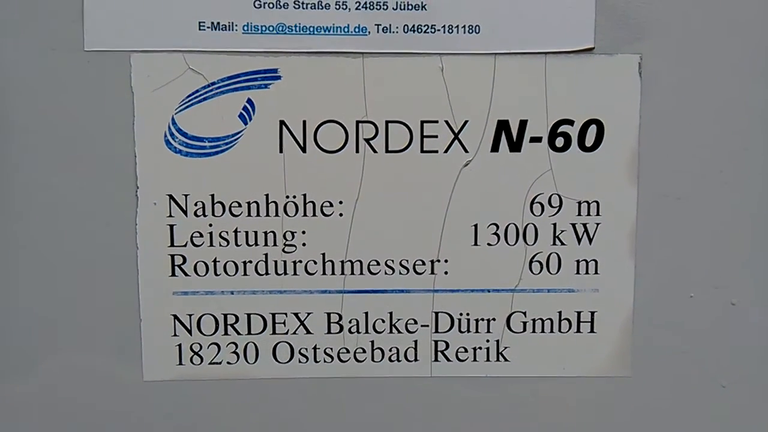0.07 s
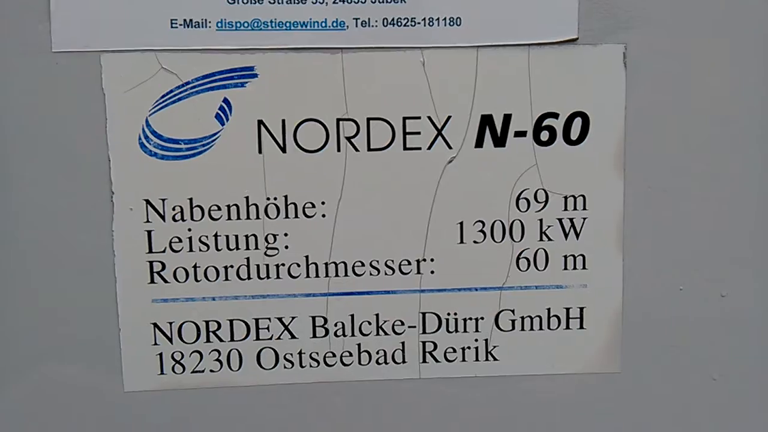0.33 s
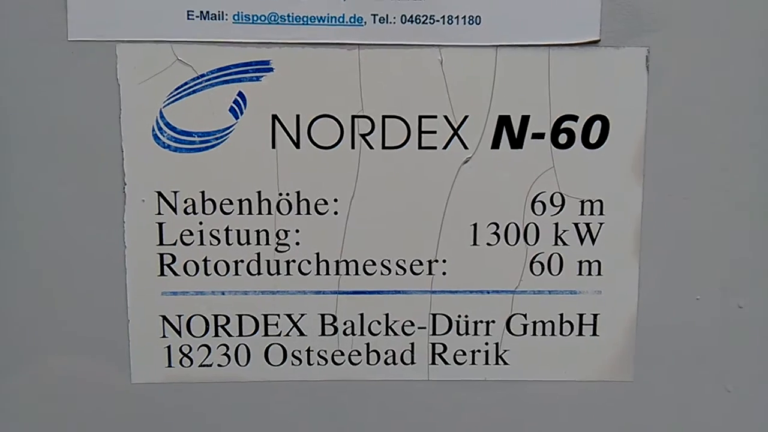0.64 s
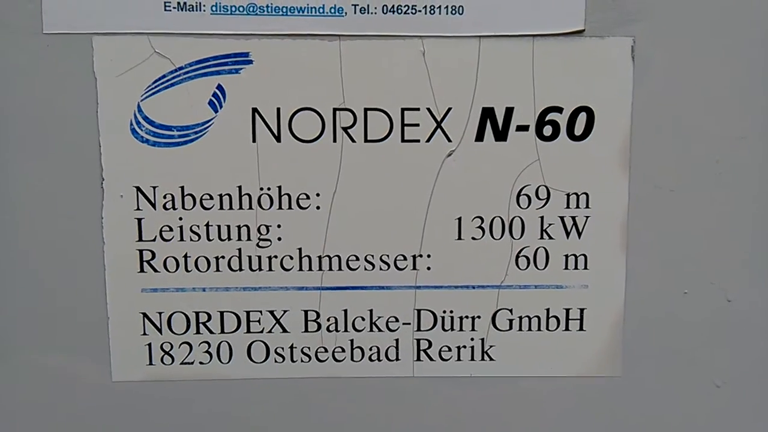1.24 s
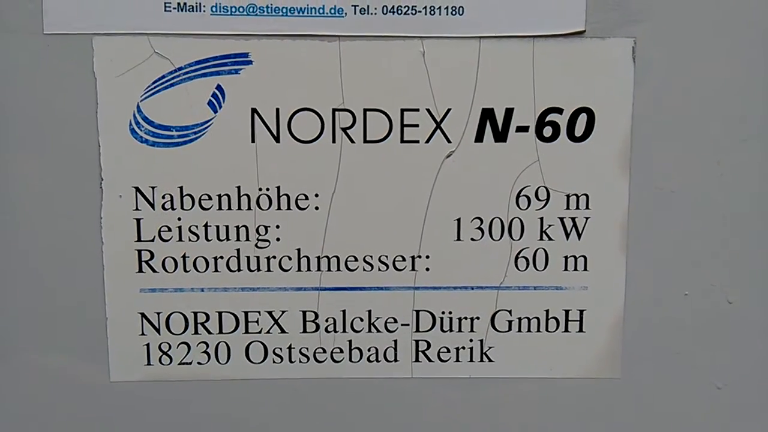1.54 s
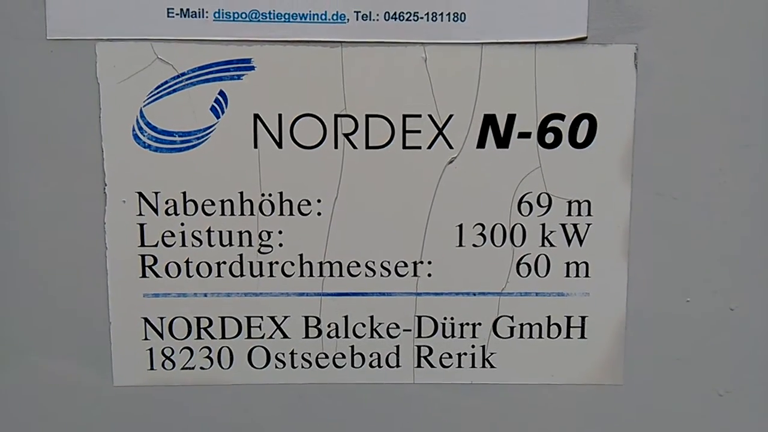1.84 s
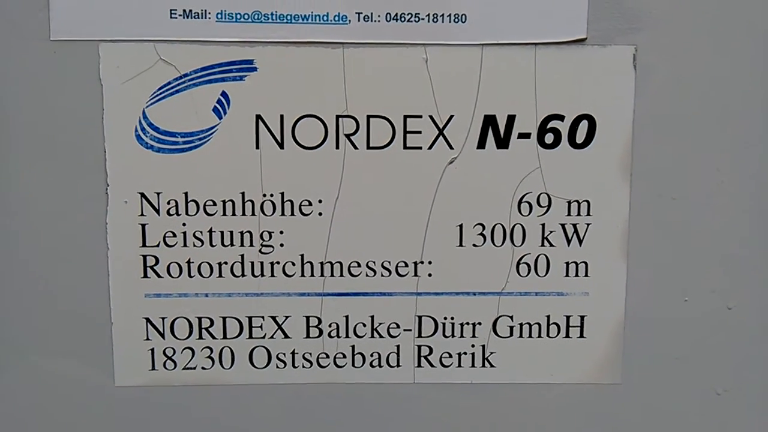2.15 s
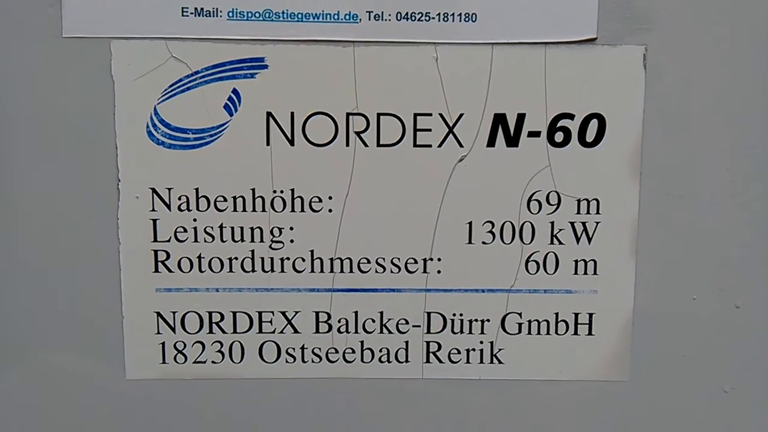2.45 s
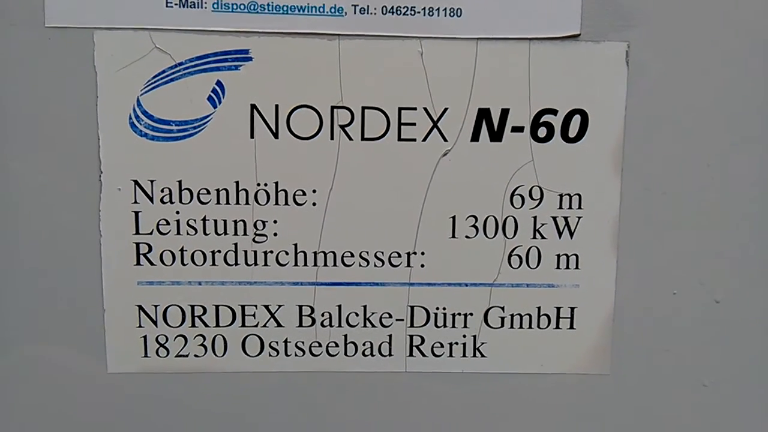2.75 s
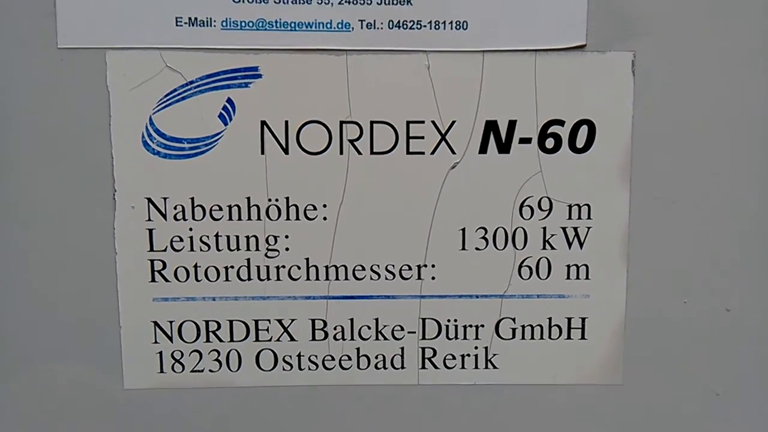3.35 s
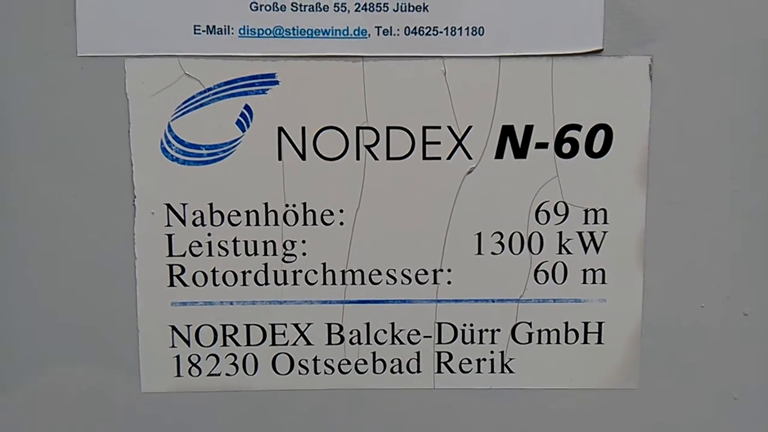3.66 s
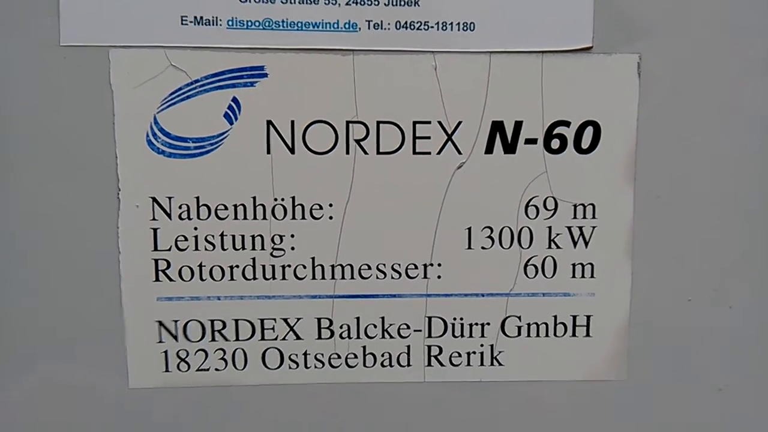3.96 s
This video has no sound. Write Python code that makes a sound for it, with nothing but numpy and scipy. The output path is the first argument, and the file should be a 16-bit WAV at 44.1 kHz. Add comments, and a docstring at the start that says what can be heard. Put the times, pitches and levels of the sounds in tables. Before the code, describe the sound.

Gusty wind buffets the microphone with a low, fluttering rumble and sharp bumps.

```python
"""At the foot of a wind turbine, gusty wind buffets a hand-held microphone.
Big eddies push out a low rumble; small ones make a fluttering rush that turns to fizz in the hard
gusts, with sharp bumps of air on top. Behind the wind sit a thin hiss of air, a faint high swish and
a sinking whistle, the last two probably from the blades. The loudest peaks overload and are rounded off."""
import sys
import numpy as np
from scipy import signal
from scipy.fft import rfft, irfft
from scipy.io import wavfile
from scipy.ndimage import uniform_filter1d, minimum_filter1d

SR = 44100
rng = np.random.default_rng(int(sys.argv[2]) if len(sys.argv) > 2 else 0)


def materialize(psi):
    """Save the field psi as 16-bit PCM at rate SR to the path in sys.argv[1].

    A 1-D psi becomes a single channel; in a 2-D psi each row is a channel.
    """
    bounded = np.clip(np.atleast_2d(psi).T, -1, 1)
    quanta = np.round(bounded * 32767).astype(np.int16)
    wavfile.write(sys.argv[1], SR, quanta)


N = 176400

# pressure swings on the diaphragm (time [s], deep rumble level [dB], thud level [dB])
PRESSURE_SWINGS = [(0.0, -35, -22.5), (0.09, -19, -23), (0.11, -25, -24.5), (0.23, -21, -31),
                   (0.3, -26, -22), (0.31, -37, -28), (0.33, -18, -25.5), (0.44, -17.5, -33),
                   (0.47, -19, -23.5), (0.54, -22, -28.5), (0.59, -46, -21.5), (0.62, -22, -32),
                   (0.68, -38, -29), (0.72, -20, -25.5), (1.04, -32.5, -31), (1.12, -23, -32),
                   (1.18, -28, -34), (1.29, -27.5, -23.5), (1.36, -28.5, -39), (1.44, -42, -34),
                   (1.46, -25.5, -22.5), (1.58, -33, -50.5), (1.67, -21, -28), (1.8, -27, -25),
                   (1.83, -28, -26), (1.88, -26.5, -21.5), (2.34, -21, -25.5), (2.49, -23, -17),
                   (2.54, -19, -34), (2.58, -22, -21.5), (2.61, -18.5, -23.5), (2.93, -23.5, -24.5),
                   (3.19, -16.5, -23), (3.24, -11, -18), (3.29, -28, -25), (3.3, -14, -13.5),
                   (3.42, -24, -20.5), (3.51, -11, -22.5), (3.55, -35, -21), (3.61, -14, -22),
                   (3.7, -19, -23), (4.0, -20.5, -22)]
# turbulence at the microphone port (time [s], buffet level [dB], rush level [dB], fizz level [dB])
GUST_LEVELS = [(0.0, -39, -38, -59), (0.02, -31.5, -45.5, -67), (0.1, -32, -40, -68),
               (0.12, -25, -35, -59.5), (0.24, -31, -40, -62), (0.29, -33.5, -64, -73),
               (0.31, -21, -22, -48), (0.33, -23, -20.5, -31), (0.34, -32.5, -35, -53),
               (0.48, -33, -40.5, -62), (0.51, -26.5, -26.5, -42), (0.71, -24, -26, -49.5),
               (0.78, -31, -36.5, -64), (0.9, -23, -23.5, -44.5), (0.96, -28.5, -36, -67),
               (1.18, -26, -26.5, -58), (1.4, -24.5, -35, -74), (1.44, -24.5, -27.5, -62),
               (1.53, -31, -39, -83), (1.69, -27, -38.5, -66), (1.84, -35, -68, -75),
               (1.85, -22.5, -48, -71), (1.88, -33, -38.5, -75), (2.04, -22.5, -28, -56),
               (2.06, -30, -33.5, -57.5), (2.22, -36, -53.5, -66), (2.26, -27, -36, -64),
               (2.41, -40, -46.5, -79), (2.48, -30, -55, -61), (2.49, -27, -32, -47),
               (2.57, -29, -30, -52.5), (2.58, -36, -22.5, -45), (2.62, -32.5, -35, -58),
               (2.73, -28.5, -31.5, -51), (2.74, -47, -39, -66), (2.77, -31.5, -47.5, -61),
               (3.0, -29, -46, -68.5), (3.01, -24.5, -36, -61), (3.14, -29.5, -29, -51.5),
               (3.17, -19, -36, -37.5), (3.2, -34.5, -34, -54), (3.36, -24.5, -27, -40),
               (3.58, -29, -37.5, -55.5), (3.64, -29, -31, -45), (3.68, -38, -36.5, -59),
               (3.8, -22.5, -28, -36), (3.94, -29, -31, -50), (4.0, -21, -25, -35)]
# choppiness of the flow (time [s], flutter depth [factor])
CHOPPINESS = [(0, 1.23), (.45, 0.81), (.6, 0.51), (1.45, 0.83), (1.9, 1.1), (2.6, 0.95), (3.0, 1.06),
              (3.35, 1.06), (3.7, 1.25), (3.82, 0.39), (4, 1)]
# split-second dips, and the odd lift, in the turbulence (time [s], half width [s], gain [dB])
GUST_DIPS = [(.285, 0.0055, -5), (.372, 0.0043, -7), (1.084, .012, 0.5), (1.141, 0.0022, -2.5),
             (1.864, 0.0044, -7), (1.975, 0.0034, -3), (2.225, 0.009, 2), (2.475, 0.0088, -6),
             (2.834, 0.0066, -8), (2.985, 0.0098, -6), (3.163, 0.0033, -8.5), (3.331, 0.003, -15.5),
             (3.409, .005, -1.5), (3.525, 0.0052, -9), (3.588, 0.0071, -4), (3.678, 0.0047, -5)]
# swells of high hiss (time [s], level [dB], half width [s])
SWISH_CUES = [(.4, -63, 0.091), (1.5, -58.5, 0.11), (2.15, -66, 0.024), (2.46, -63, 0.11), (2.82, -64, .06),
              (3.58, -66, 0.15)]
# the whistle's downward glide (time [s], pitch [Hz], level [dB])
WHISTLE_GLIDE = [(.26, 10500, -80), (.35, 9750, -71), (.43, 9320, -77), (.5, 9050, -77), (.7, 8700, -85),
                 (.93, 8350, -73), (1.1, 8300, -92)]
# hits of air (time [s], length [s], slap level [dB], crackle level [dB])
BUMP_CUES = [(.293, 0.0033, -35, -70), (0.301, .033, -21, -37.5), (0.38, 0.014, -28, -42.5),
             (0.512, 0.014, -18, -39), (0.607, 0.0062, -17.5, -38), (1.145, 0.0069, -26, -44),
             (1.307, 0.011, -25, -66), (1.652, 0.0055, -25, -65), (1.764, 0.024, -39, -74),
             (1.98, 0.0065, -21, -50), (2.039, 0.0042, -23.5, -51), (2.079, 0.006, -18.5, -39.5),
             (2.24, 0.014, -28.5, -56), (2.464, 0.0035, -29, -66), (2.489, 0.0052, -27, -58),
             (2.582, 0.003, -9.5, -25), (2.635, 0.013, -26, -48), (2.753, 0.0074, -28.5, -68),
             (2.848, 0.0074, -38, -73), (3.003, 0.0038, -26.5, -65), (3.034, .005, -32, -48),
             (3.167, 0.0071, -18, -53), (3.241, 0.0068, -22.5, -39), (3.312, 0.0097, -19, -33.5),
             (3.349, 0.0027, -40, -33), (3.364, 0.004, -21, -26), (3.382, 0.0034, -36, -34),
             (3.423, 0.0094, -20.5, -32.5), (3.475, 0.0068, -22, -37.5), (3.537, 0.0022, -20.5, -60),
             (3.597, .006, -24.5, -40), (3.643, 0.005, -19.5, -33), (3.686, 0.0034, -24, -56),
             (3.713, 0.0035, -19, -34.5), (3.789, 0.0086, -21, -32.5)]

# tone of each noise layer (frequency [Hz], relative level [dB])
RUMBLE_EQ = [(15, -45.5), (30, -27), (42, -6.5), (60, -2), (95, -6), (130, -12.5), (200, -31.5), (400, -60),
             (3000, -110)]
THUD_EQ = [(50, -29.5), (90, -5), (125, -0.5), (180, -2), (250, -8), (350, -14), (900, -55), (3000, -89.5)]
BUFFET_EQ = [(100, -16), (250, -6), (480, -0.5), (800, -6.5), (1100, -10.5), (1700, -24), (3000, -51.5),
             (6000, -78.5)]
RUSH_EQ = [(400, -25), (750, -1.5), (1050, -2.5), (1700, -3), (2400, -12), (3200, -21.5), (4500, -38.5),
           (8000, -75.5)]
FIZZ_EQ = [(1200, -26.5), (2400, 4.5), (3500, 1.5), (5000, -7.5), (7000, -16.5), (9000, -24.5),
           (11000, -36), (14000, -43.5)]
AIR_EQ = [(500, -1), (3000, 6.5), (5200, -2), (7500, 4), (9000, -4), (11000, -11), (14000, -12)]
SWISH_EQ = [(3000, -13), (5500, -6.5), (7700, 2), (9500, -4), (11500, -16), (14000, -21)]
SLAP_EQ = [(40, -18), (200, 3), (500, 2), (1000, -2.5), (1800, -7.5), (2600, -15), (4000, -32.5),
           (7500, -56.5), (14000, -78)]
CRACKLE_EQ = [(600, -18.5), (1800, -0.5), (3500, 4.5), (6000, -4.5), (8000, -11), (10500, -27.5),
              (14000, -35.5)]

TIME, FREQS = np.arange(N) / SR, np.fft.rfftfreq(N, 1 / SR)


def amp(db):
    """Decibels to gain."""
    return 10 ** (np.asarray(db) / 20)


def unit(x):
    """Scales to rms 1."""
    return x / np.sqrt(np.mean(x ** 2) + 1e-20)


def curves(table):
    """One automation curve for each column after the time, in straight ramps."""
    times, *columns = np.transpose(table)
    return [np.interp(TIME, times, column) for column in columns]


def bell(when, half_width):
    """A bell-shaped fade in and out."""
    return np.exp(-.5 * ((TIME - when) / half_width) ** 2)


def noise(eq):
    """Noise of rms 1 through an EQ curve."""
    hz, db = np.transpose(eq)
    gain = amp(np.interp(np.log(FREQS + 1), np.log(hz), db))
    return unit(irfft(rfft(rng.standard_normal(N)) * gain, N))


def steady(x, span_s):
    """Levels out the slow swells of a noise, keeping its fast lumps."""
    size = int(span_s * SR)
    power = abs(uniform_filter1d(uniform_filter1d(x ** 2, size), size)) + 1e-14
    return x / np.sqrt(power)


def patchy(x, patch_hz, patch_s, depth_db=3.0):
    """Lets narrow stretches of the spectrum swell and fade by chance."""
    hz, t, spectrum = signal.stft(x, SR, nperseg=1024, noverlap=768)
    across, along = np.fft.fftfreq(len(hz), hz[1])[:, None], np.fft.fftfreq(len(t), t[1])
    blur = np.exp(-(across * patch_hz) ** 2 - (along * patch_s) ** 2)
    patches = unit(np.fft.ifft2(np.fft.fft2(rng.standard_normal(spectrum.shape)) * blur).real)
    _, mottled = signal.istft(spectrum * amp(depth_db * patches), SR, nperseg=1024, noverlap=768)
    return unit(mottled[:N])


def rumble(deep_trim_db, thud_trim_db):
    """Large eddies push on the diaphragm: a deep rumble with thudding above it."""
    deep_db, thud_db = curves(PRESSURE_SWINGS)
    deep = steady(noise(RUMBLE_EQ), span_s=.034) * amp(deep_db + deep_trim_db)
    thud = steady(noise(THUD_EQ), span_s=.04) * amp(thud_db + thud_trim_db)
    return deep + thud


def flutter(slow_hz=13, fast_hz=130):
    """A modulator: quick random swings of the air speed as eddies pass."""
    band = (FREQS / slow_hz) ** 2 / (1 + (FREQS / slow_hz) ** 2.22) / (1 + (FREQS / fast_hz) ** 2)
    swings = unit(irfft(rfft(rng.standard_normal(N)) * band, N))
    return 2.28 * np.tanh(swings / 2.8)


def turbulence():
    """Small eddies at the port: one flutter shakes buffet, rush and fizz, the higher layers more."""
    eddies = flutter()
    chop, = curves(CHOPPINESS)

    def layer(eq, shared_depth, own_depth, trim_db):
        swirl = patchy(noise(eq), patch_hz=181, patch_s=.047)
        shake_db = chop * (shared_depth * eddies + own_depth * flutter())
        return amp(trim_db) * steady(swirl * amp(shake_db), span_s=.051)

    buffet_db, rush_db, fizz_db = curves(GUST_LEVELS)
    buffet = amp(buffet_db) * layer(BUFFET_EQ, shared_depth=2, own_depth=3, trim_db=.5)
    rush = amp(rush_db) * layer(RUSH_EQ, shared_depth=4, own_depth=1.8, trim_db=.5)
    fizz = amp(fizz_db) * layer(FIZZ_EQ, shared_depth=4.5, own_depth=-.1, trim_db=5.5)
    dips_db = sum(db * bell(when, half_width) for when, half_width, db in GUST_DIPS)
    return (buffet + rush + fizz) * amp(dips_db)


def air_hiss(level_db):
    """A quiet bed of hissing air whose colour keeps shifting."""
    return amp(level_db) * patchy(noise(AIR_EQ), patch_hz=700, patch_s=.07)


def blade_swish():
    """A smooth, thin hiss that swells and fades, probably the blades sweeping by."""
    swells = sum(amp(db) * bell(when, half_width) for when, db, half_width in SWISH_CUES)
    return swells * noise(SWISH_EQ)


def whistle(half_width_hz):
    """A narrow band of hiss that glides down, probably off a blade."""
    pitch_hz, level_db = curves(WHISTLE_GLIDE)
    band = np.exp(-(np.fft.fftfreq(N, 1 / SR) / half_width_hz) ** 2)
    white = rng.standard_normal(N) + 1j * rng.standard_normal(N)
    waver = np.fft.ifft(np.fft.fft(white) * band)
    carrier = np.exp(2j * np.pi * np.cumsum(pitch_hz) / SR)
    gate = (TIME > WHISTLE_GLIDE[0][0]) & (TIME < WHISTLE_GLIDE[-1][0])
    return unit((waver * carrier).real) * amp(level_db) * gate


def bumps(attack_s, release_s, flutter_depth):
    """Air hits the microphone in tight bursts with no ring: a dull slap with crackle on top."""
    slap_gain, crackle_gain = np.zeros(N), np.zeros(N)
    for start, length, slap_db, crackle_db in BUMP_CUES:
        on = (TIME > start) & (TIME < start + length + 10 * release_s)
        age = TIME[on] - start
        envelope = np.minimum(age / attack_s, 1) * np.exp(-np.maximum(age - length, 0) / release_s)
        slap_gain[on] += amp(slap_db) * envelope
        crackle_gain[on] += amp(crackle_db) * envelope
    tearing = steady(amp(flutter_depth * flutter()), span_s=.012)
    slap = slap_gain * steady(noise(SLAP_EQ), span_s=.0046)
    crackle = crackle_gain * noise(CRACKLE_EQ)
    return tearing * (slap + crackle)


def scene():
    """The mono mix at one microphone, which rolls off the very lowest bass."""
    mix = rumble(deep_trim_db=1.5, thud_trim_db=.5) + turbulence()
    mix += air_hiss(level_db=-65.5) + blade_swish() + whistle(half_width_hz=99)
    mix += bumps(attack_s=.00078, release_s=.0019, flutter_depth=2.5)
    low_cut_hz = 44
    return irfft(rfft(mix) / np.sqrt(1 + (low_cut_hz / (FREQS + 1)) ** 10), N)[None]


def record(dry):
    """Overload: a quick limiter eases the peaks, a soft clip rounds them, a high cut trims the top."""
    threshold_db, limit_share, window = -9.5, .32, int(.003 * SR)
    ceiling_db, knee, high_cut_hz = -8.5, 12, 14400
    needed_db = np.minimum(threshold_db - 20 * np.log10(abs(dry) + 1e-9), 0)
    duck_db = limit_share * uniform_filter1d(minimum_filter1d(needed_db, window), window)
    limited = dry * amp(duck_db)
    clipped = limited / (1 + abs(limited / amp(ceiling_db)) ** knee) ** (1 / knee)
    high_cut = signal.firwin(511, high_cut_hz, window=("kaiser", 9), fs=SR)
    return signal.oaconvolve(clipped, high_cut[None], "same")


dry = scene()
out = record(dry)
materialize(out)
```